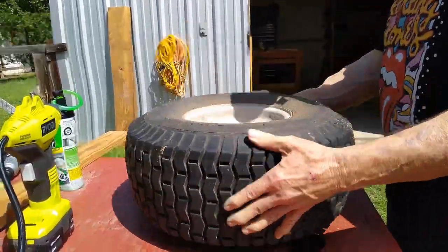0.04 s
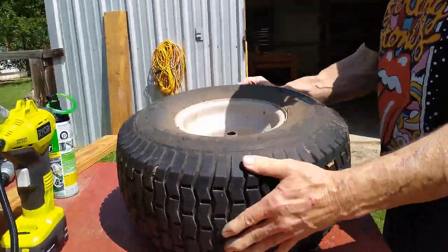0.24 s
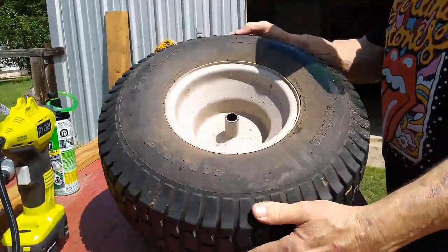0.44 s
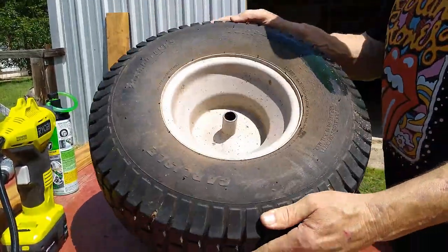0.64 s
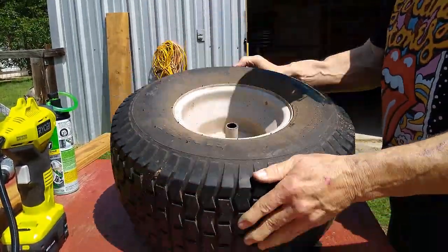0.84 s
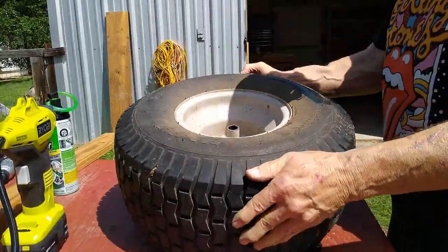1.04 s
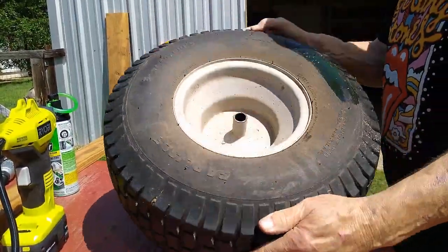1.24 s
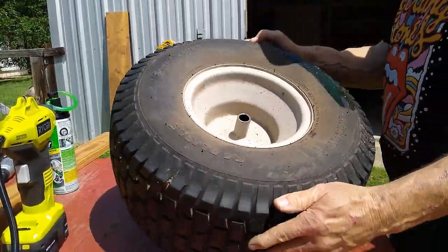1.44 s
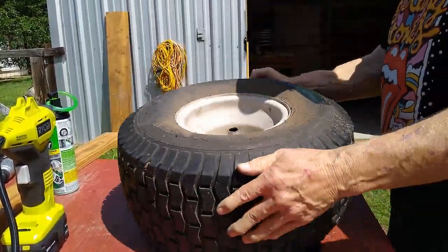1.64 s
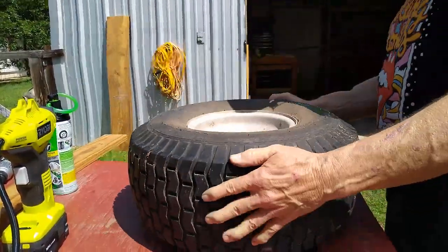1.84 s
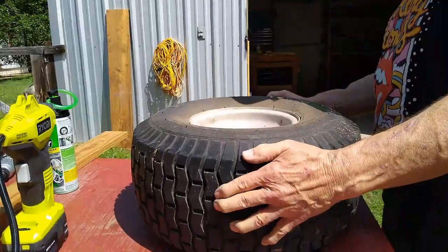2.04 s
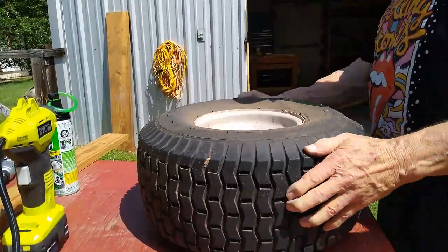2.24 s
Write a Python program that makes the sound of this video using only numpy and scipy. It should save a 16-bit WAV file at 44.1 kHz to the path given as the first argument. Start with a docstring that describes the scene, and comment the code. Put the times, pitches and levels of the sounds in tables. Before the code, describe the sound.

Two dull, rattling thumps of a small tire dropped on a wooden table outside.

```python
"""Tyre dropped on a yard table

Outdoors, a phone close to a wooden table. A small rubber tyre on a steel rim is tipped by hand and
dropped back. Each landing swings the table top low, knocks and rattles the boards and ticks the rim;
palms rub the rubber. Far off an engine hums and slows; light wind puffs on the two microphone ports."""
import sys
import numpy as np
from scipy import signal
from scipy.fft import rfft, irfft
from scipy.io import wavfile
from scipy.ndimage import uniform_filter1d

SR = 44100
rng = np.random.default_rng(int(sys.argv[2]) if len(sys.argv) > 2 else 0)


def master_out(mix):
    """Clip the mix to full scale and print it as 16-bit PCM to the path in sys.argv[1]."""
    frames = np.transpose(np.atleast_2d(mix))
    ceiling = np.clip(frames, -1, 1)
    pcm = np.round(ceiling * 32767).astype(np.int16)
    wavfile.write(sys.argv[1], SR, pcm)


N = 101430
T = np.arange(N) / SR
BIN_HZ = np.maximum(np.arange(N // 2 + 1) * SR / N, 1)


def undb(db):
    """dB to gain."""
    return 10 ** (np.asarray(db) / 20)


def curve(table, column):
    """One column of a table along time."""
    return np.interp(T, np.array(table)[:, 0], np.array(table)[:, column])


def spectrum(table, below=None):
    """A (Hz, dB) table along log frequency."""
    hz, db = np.array(table).T
    return np.interp(np.log(BIN_HZ), np.log(hz), db, left=below)


def pan(x, db):
    """Left louder than right by db."""
    return x * undb(np.array([[.5], [-.5]]) * db)


def noise(colour, alike_hz):
    """Stereo noise of rms 1 with a (Hz, dB) colour, alike left and right below alike_hz."""
    mid, side = rfft(rng.standard_normal((2, N))) * undb(spectrum(colour, below=-80))
    alike = 1 / (1 + (BIN_HZ / alike_hz) ** 2)
    mid, side = np.sqrt(1 + alike) * mid, np.sqrt(1 - alike) * side
    x = irfft(np.array([mid + side, mid - side]), N)
    return x / x.std()


def walk(per_s):
    """Smooth random drift of spread 1."""
    hold = int(SR / per_s)
    steps = np.repeat(rng.standard_normal(N // hold + 1), hold)
    x = uniform_filter1d(uniform_filter1d(steps, hold), hold)[:N]
    return x / x.std()


def ring(force, hz, t60):
    """One damped mode driven by a force."""
    pole = np.exp((2j * np.pi * hz - np.log(1000) / t60) / SR)
    return signal.lfilter([1], [1, -pole], force).imag


# Balance at the phone. Each row: frequency in Hz, left over right in dB.
PORT_BALANCE = [(1000, -1), (4000, 1), (8000, 2), (14000, 9.5)]
def lean_left(x):
    """The left port hears more of the high treble."""
    return irfft(pan(rfft(x), spectrum(PORT_BALANCE)), N)


# Open air all around. Each row: frequency in Hz, relative level in dB.
YARD_COLOUR = [(88, 15), (150, -3.5), (225, -16.5), (420, -4.5), (595, -51), (796, -12), (2020, -20.5),
               (2360, -16.5), (6230, -27.5), (11800, -20), (15500, -28)]
def yard():
    """The quiet outdoor floor, wavering slightly."""
    return noise(YARD_COLOUR, alike_hz=1390) * undb(-62 + walk(6.6))


# Far off. Each row: time in seconds, firing rate in Hz, level of that tone in dB, of its octave in dB.
ENGINE = [(0, 100.7, -55, -70), (.5, 104.6, -56, -75), (.62, 102.6, -51.5, -70), (.8, 96.46, -48.5, -71),
          (.87, 89.2, -46.5, -62), (.95, 86.1, -53, -57.5), (1.05, 80, -60, -57.5),
          (1.16, 79.5, -66.5, -59), (1.25, 79.3, -60.5, -61.5), (1.38, 81.25, -54.5, -54),
          (1.5, 82, -53, -77), (1.9, 76, -62, -62), (2.3, 74, -53.5, -66)]
def engine(flicker_db=2.5):
    """A distant engine's firing tone and its octave, slightly unsteady."""
    firing_hz = curve(ENGINE, 1) * (1 + 0.013 * walk(21.25))
    phase = 2 * np.pi * np.cumsum(firing_hz) / SR
    tones = [undb(curve(ENGINE, k + 1) + flicker_db * walk(22)) * np.sin(k * phase) for k in (1, 2)]
    return np.sqrt(2) * sum(tones)


# Wind right on the microphone. Each row: time in seconds, left level in dB, right level in dB.
GUSTS = [(0, -44.5, -82), (.07, -30, -35.5), (.11, -41, -48), (.3, -32, -34.5), (.42, -43.5, -46.5),
         (.52, -42.5, -50), (.68, -57.5, -58), (.85, -41, -69.5), (1.0, -54.5, -68), (1.15, -43.5, -53),
         (1.2, -33, -73), (1.3, -22, -39), (1.36, -36, -38.5), (1.45, -35.5, -54), (1.57, -38, -38.5),
         (1.67, -50, -38), (1.76, -52, -39.5), (1.85, -42, -48), (2.05, -37, -35.5), (2.18, -47, -49),
         (2.3, -50.5, -39)]
# Its rumble. Each row: frequency in Hz, relative level in dB.
WIND_COLOUR = [(12, -113), (20, -15.5), (47, 6), (75, 10), (114, -2), (168, -6.5), (352, -39), (420, -53),
               (500, -26.5), (650, -138), (1100, -120)]
# Its pops. Each row: start in seconds, level in dB, starting pitch in Hz, cycles to fade to about a third.
POPS = [(0.827, -30, 131, 1.0), (1.205, -22, 142, .9), (1.2182, -7.5, 234, 0.81), (1.2337, -13.5, 140, .7),
        (1.243, -15.5, 172, 0.82), (1.256, -19, 85, .9), (1.270, -10, 145, 1.7), (1.2925, -12, 86, 1.2),
        (1.428, -25, 160, 0.64), (1.533, -27.5, 130, 1.0), (1.573, -24, 149, 0.9)]
def wind(pop_fall=0.45, rise_cycles=0.12):
    """Air buffets each port with a rumble of its own; soft falling pops hit the left one."""
    out = noise(WIND_COLOUR, alike_hz=5) * undb([curve(GUSTS, port) + 2 * walk(8.7) for port in (1, 2)])
    pops = np.zeros(N)
    for start, db, hz, fade in POPS:
        cycles = np.maximum(T - start, 0) * hz
        envelope = np.exp(-cycles / fade) * (1 - np.exp(-cycles / rise_cycles))
        pops += undb(db) * envelope * np.sin(2 * np.pi * np.log1p(pop_fall * cycles) / pop_fall)
    out[0] += signal.sosfiltfilt(signal.butter(3, 520, fs=SR, output="sos"), pops)
    return out


# Faint, short high chirps; the two at 3900 Hz are faint scuffs. Each row: centre in seconds, drive level in dB,
# pitch in Hz.
CHIRPS = [(.56, -66.5, 6300), (.575, -68, 5800), (0.756, -70, 5550), (1.084, -69, 2470), (1.104, -68, 2010),
          (1.121, -60.5, 3120), (1.121, -66, 1850), (1.145, -70, 3350), (1.22, -70, 3900),
          (1.275, -70, 3900), (1.739, -69, 5050)]
def chirps(width_s=.004):
    """Each chirp is a puff of noise ringing one short, high mode."""
    out = np.zeros((2, N))
    for centre, db, hz in CHIRPS:
        burst = np.exp(-.5 * ((T - centre) / width_s) ** 2) * rng.standard_normal((2, N))
        out += undb(db) * ring(burst, hz, t60=.006) / 2
    return out


# Hands on the tyre, close by. Each row: time in seconds, level in dB.
RUB = [(0, -68.5), (.04, -63), (.11, -49.5), (.2, -56), (.29, -83), (.35, -72), (.45, -72), (.49, -61.5),
       (.58, -63.5), (.66, -110), (.76, -78), (.88, -62.5), (.98, -70.5), (1.13, -75), (1.2, -75.5),
       (1.45, -78), (1.62, -67), (1.72, -63.5), (1.82, -71.5), (1.88, -54), (1.99, -58.5), (2.07, -70.5),
       (2.13, -55.5), (2.2, -49), (2.3, -45.5)]
# The rubbing. Each row: frequency in Hz, relative level in dB.
RUB_COLOUR = [(150, -41), (250, -1.5), (335, 4), (392, -2), (474, -7), (692, -16.5), (1050, -12.5),
              (1670, -15.5), (11400, -14.5), (15500, -22)]
def palms():
    """Palms slide on rubber with a soft hiss."""
    return lean_left(noise(RUB_COLOUR, alike_hz=1250)) * undb(curve(RUB, 1))


# The tyre settling. Each row: time in seconds, level of taps on the boards in dB, of the tread in dB.
SETTLING = [(0, -98, -93), (.11, -70, -78), (.13, -41.5, -39), (.16, -49.5, -45.5), (.17, -47.5, -44.5),
            (.205, -49, -60), (.225, -48, -44.5), (.26, -46, -46.5), (.285, -60, -56.5), (.33, -67.5, -65),
            (.46, -77, -75), (.7, -86, -74.5), (.78, -74.5, -92), (.9, -83.5, -80), (1.4, -81.5, -81),
            (1.6, -80, -73), (1.86, -76, -62.5), (1.9, -50.5, -56), (1.945, -61, -56.5),
            (1.98, -53.5, -49.5), (2.0, -67.5, -64), (2.1, -73.5, -89), (2.3, -62.5, -68)]
def settling(taps_per_s=1500):
    """Small contacts: random taps for the boards and a flickering gain for the tread's scrunch."""
    taps = (rng.random(N) < taps_per_s / SR) * undb(2 * rng.exponential(size=N) + curve(SETTLING, 1))
    scrunch = undb(curve(SETTLING, 2) + 2 * walk(150))
    return taps, scrunch


# Rim and grit, close by. Each row: start in seconds, lower treble level in dB, upper treble level in dB.
TICKS = [(.1245, -28.5, -35), (0.142, -42, -33), (.149, -27, -40), (.180, -37, -58), (0.2143, -39, -58),
         (0.2355, -35, -26), (0.2487, -28.5, -24.5), (.264, -35, -33.5), (0.3747, -48, -51),
         (1.038, -52, -48), (1.148, -71, -59), (1.806, -75, -42), (1.874, -70, -34), (1.906, -40, -51.5),
         (1.913, -33, -31.5), (1.934, -37, -47), (1.944, -35, -42), (1.9551, -23, -25.5), (1.968, -35, -50),
         (1.974, -36, -49)]
# Ticks and tread share one colour. Each row: frequency in Hz, relative level in dB.
TICK_COLOUR = [(710, -42), (1200, 3.5), (1410, -8.5), (2210, -7.5), (3540, -13), (5980, -10), (6650, -16),
               (12500, -15), (15500, -12.5)]
def rim_and_tread(scrunch, rise_s=0.00097, t60_s=0.012, split_hz=7100):
    """Rim and grit tick in short bright bursts over the scrunch of the tread."""
    gains = np.tile(scrunch, (2, 1))
    for start, low_db, high_db in TICKS:
        age = np.clip(T - start, 0, 1)
        burst = undb(-60 * age / t60_s) * np.minimum(age / rise_s, 1)
        gains += np.outer(undb([low_db, high_db]), burst)
    fizz = noise(TICK_COLOUR, alike_hz=2100)
    low = signal.sosfiltfilt(signal.butter(2, split_hz, fs=SR, output="sos"), fizz)
    return lean_left(gains[0] * low + gains[1] * (fizz - low))


# The tyre strikes the wood. Each row: start in seconds, push level in dB, time to the push's peak in ms,
# frequency in Hz around which the struck spot rings best.
KNOCKS = [(.1255, -11.5, 0.39, 1910), (.1422, -9, 0.33, 463), (.1515, -24.5, 0.28, 627),
          (.179, -13.5, 0.53, 510), (.196, -44, 0.36, 800), (.2135, -23, 0.2, 1000),
          (.222, -17.5, 0.49, 380), (.2365, -12.5, 0.66, 610), (.2505, -17.5, 0.43, 575),
          (.266, -19, 1, 517), (.275, -26.5, 0.52, 690), (.295, -39, .9, 350), (.312, -31, 1, 353),
          (.374, -27, 0.68, 428), (.408, -40.5, 1, 447), (.435, -50, 0.56, 800), (.466, -49.5, 0.66, 400),
          (.775, -52, 0.97, 450), (.859, -47.5, 0.58, 750), (1.297, -49.5, 0.52, 604),
          (1.8795, -30, 0.67, 700), (1.888, -30.5, .8, 400), (1.906, -20, 0.79, 388), (1.915, -24, 1, 596),
          (1.928, -23.5, 0.97, 460), (1.936, -19.5, 0.65, 760), (1.956, -10.5, 0.81, 560),
          (1.968, -12, 1, 540), (1.976, -15, 0.98, 584), (2.008, -39, .6, 700), (2.053, -31, 0.79, 640),
          (2.147, -42.5, .7, 596)]
# Board modes. Each row: frequency in Hz, gain in dB, seconds to fade by 60 dB, left over right in dB.
BOARD_MODES = [(218, 3, 0.074, 3.5), (311, 3, 0.025, -2.5), (415.4, -10, 0.017, 37.5), (526, -1.5, 0.04, 9),
               (625, -11.5, 0.02, 32), (718, -4, 0.044, 1), (878, 2.5, 0.013, 5), (965, 2.5, 0.014, 4),
               (1093, -4, 0.01, -0.5), (1592, -13.5, 0.032, 13), (2000, -1, 0.0084, -1.5),
               (2600, -2.5, 0.004, 24.5)]
def boards(taps, slap_db=-2.5, scatter_db=2.5, off_spot_db=8.5):
    """Knocks and rattling taps ring the board modes, each port hearing its own mix."""
    out = np.zeros((2, N))
    scatter = scatter_db * rng.standard_normal((len(KNOCKS), len(BOARD_MODES), 2))
    push_ms = np.arange(128) / SR * 1000
    pushes = []
    for start, db, ms, spot_hz in KNOCKS:
        span = slice(int(start * SR), int(start * SR) + len(push_ms))
        push = undb(db) * np.exp(-.5 * ((push_ms - ms) / (ms / 3)) ** 2)
        out[:, span] += undb(slap_db) * push  # the push itself, heard straight
        pulse_area = ms * SR / 1200
        pushes.append((span, push / pulse_area, spot_hz))
    for mode, (hz, db, t60, pan_db) in enumerate(BOARD_MODES):
        mid, side = taps * rng.standard_normal((2, N))
        side *= min(hz / 600, 1)  # low modes rattle more alike in both ports
        force = uniform_filter1d(np.array([mid + side, mid - side]), int(.0003 * SR))  # 0.3 ms taps
        for (span, push, spot_hz), chance_db in zip(pushes, scatter[:, mode]):
            coupling = undb(chance_db - off_spot_db * np.log2(hz / spot_hz) ** 2) * (-1) ** mode
            force[:, span] += np.outer(coupling, push)
        out += pan(undb(db) * ring(force, hz, t60), pan_db)
    return out


# Landings, close to the phone. Each row: first deep trough in seconds, level in dB, pitch there in Hz.
LANDINGS = [(0.138, -8.5, 81.5), (0.17, -22.5, 76), (0.2357, -10.5, 73), (0.271, -25.5, 65),
            (1.8967, -23, 81), (1.913, -28.5, 64.8), (1.950, -13, 70.2), (2.004, -31, 67)]
def table_top(rise_s=0.0141, hold_s=0.017, release_s=0.004, sag_per_s=15):
    """The top swings a few times under the soft tyre, sagging in pitch, then the weight damps it."""
    out = np.zeros(N)
    for trough, db, hz in LANDINGS:
        age = T - trough
        rise = np.sin(np.pi / 2 * np.clip(1 + age / rise_s, 0, 1))
        release = np.exp(-np.maximum(age - hold_s, 0) / release_s)
        cycles = hz * np.log1p(np.maximum(sag_per_s * age, -.5)) / sag_per_s
        out -= undb(db) * rise * release * np.cos(2 * np.pi * cycles)
    return pan(out, db=1)


def scene():
    """The tyre and table up close, wind on the microphone, engine and yard behind."""
    taps, scrunch = settling()
    tyre = table_top() + boards(taps) + rim_and_tread(scrunch)
    return tyre + chirps() + palms() + wind() + engine() + yard()


def record(dry):
    """The phone thins the deepest bass and cuts the top."""
    thinned = signal.sosfilt(signal.butter(2, 35, "high", fs=SR, output="sos"), dry)
    return signal.sosfilt(signal.ellip(10, .2, 80, 15700, fs=SR, output="sos"), thinned)


dry = scene()
out = record(dry)
master_out(out)
```